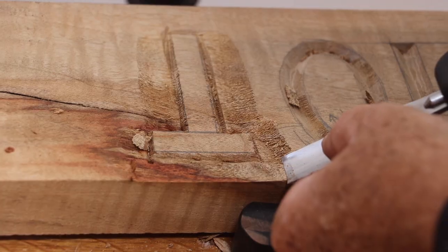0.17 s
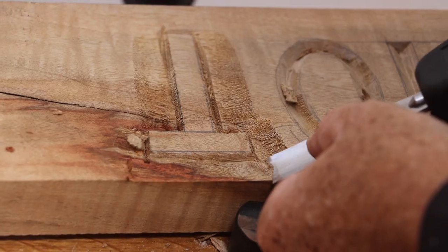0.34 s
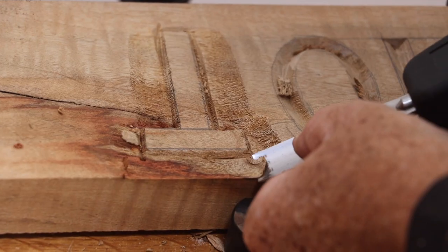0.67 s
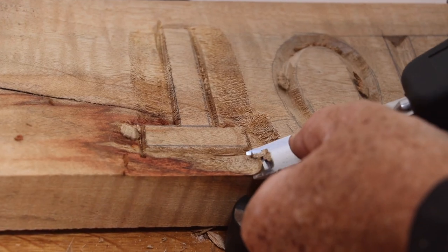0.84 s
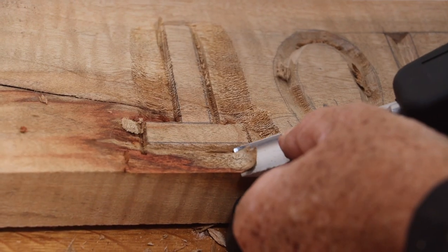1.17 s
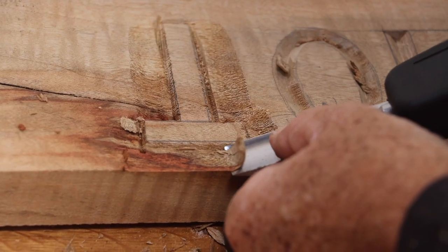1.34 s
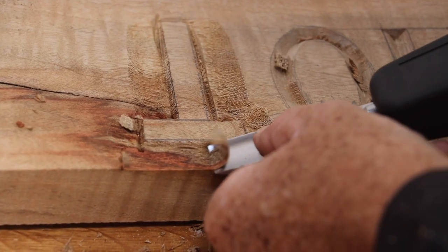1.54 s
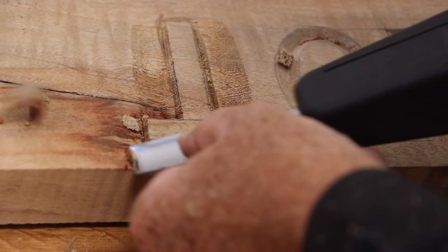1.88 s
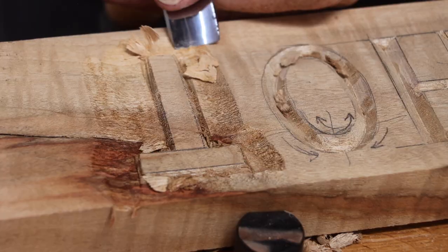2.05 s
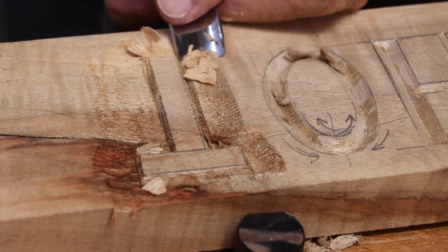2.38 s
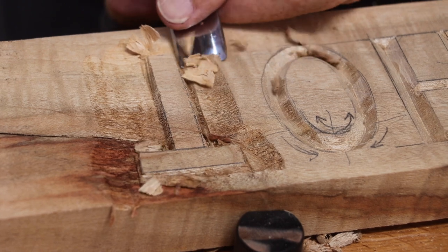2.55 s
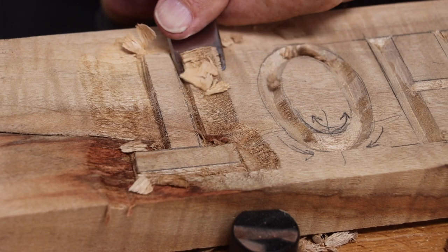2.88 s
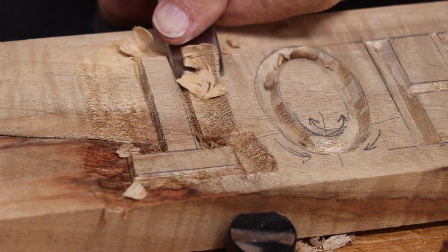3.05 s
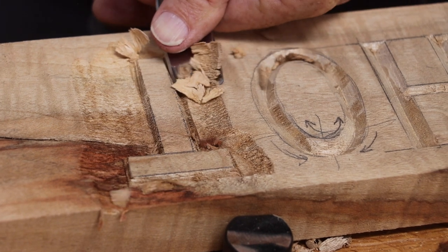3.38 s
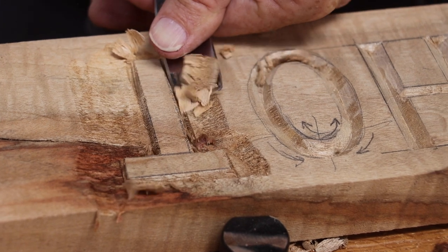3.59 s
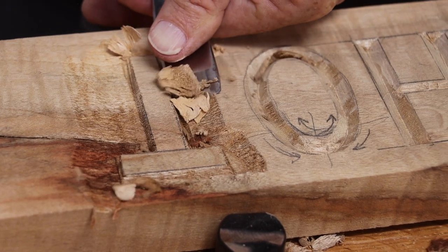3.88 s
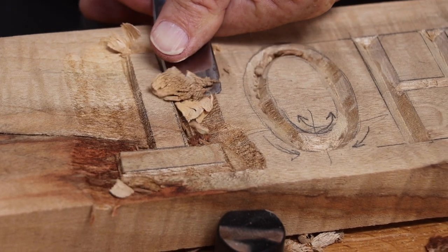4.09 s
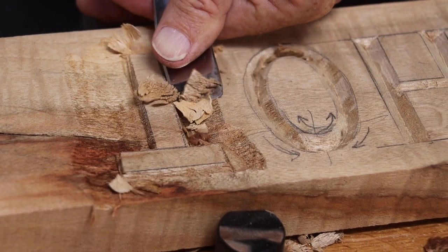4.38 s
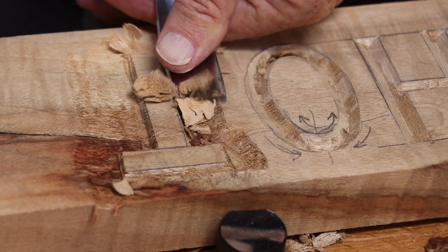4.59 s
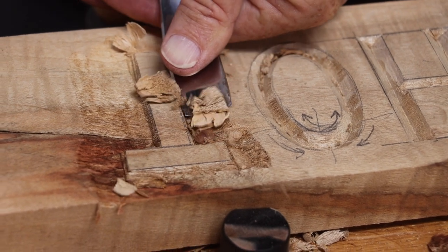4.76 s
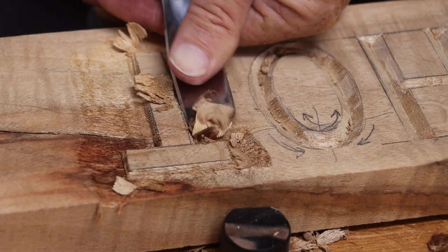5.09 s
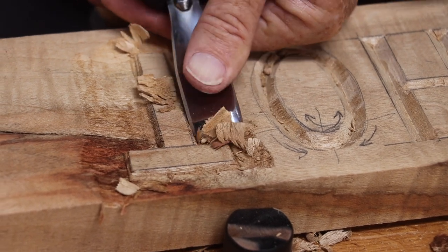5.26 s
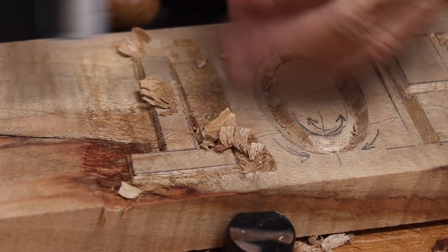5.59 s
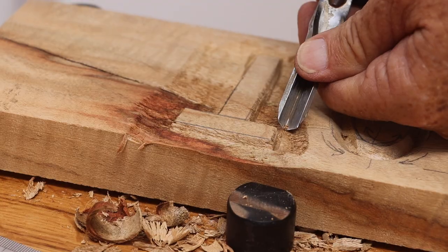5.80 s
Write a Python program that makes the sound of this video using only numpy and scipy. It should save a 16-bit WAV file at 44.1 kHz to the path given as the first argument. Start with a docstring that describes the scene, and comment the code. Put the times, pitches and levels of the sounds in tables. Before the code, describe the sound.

Close stereo pickup in a workshop. A power chisel's motor hisses and whines throughout. Separate knocks quickly merge into a bright, raspy buzz on clamped wood, ending before two seconds. After a tiny scraping touch, a longer, stronger cut growls and buzzes, with dull low thuds towards the left. It fades just after five seconds and the freed motor rises slightly in pitch.

```python
"""The motor of a carving chisel hisses and whines throughout: shaped noise and shaft-locked cosines.
From 0.27 s a cam, about 190 strokes a second, hammers the blade into a clamped board: pulses excite modes.
Lone knocks open this cut; it ends near 1.7 s, and a brief touch with a short noise burst follows near 1.87 s.
The second cut, 2.04 to 5.26 s, goes deeper; low decaying bumps, the thuds, accompany it, louder on the left.
The blade then lifts and the motor runs on, faster, to the end."""
import sys
import numpy as np
from scipy import signal
from scipy.fft import rfft, irfft
from scipy.io import wavfile
from scipy.ndimage import uniform_filter1d

SR = 44100
rng = np.random.default_rng(int(sys.argv[2]) if len(sys.argv) > 2 else 0)


def int16_out(signal):
    """Quantize to a 16-bit WAV file."""
    q = np.round(np.clip(np.atleast_2d(signal).T, -1, 1) * 32767)
    wavfile.write(sys.argv[1], SR, q.astype(np.int16))


N = 261513

# shaft speed, sagging under load: (time [s], rate [strokes/s])
SHAFT_SPEED = [(0, 198), (.5, 190.6), (.85, 189.8), (1.1, 189.5), (1.6, 189.5), (2.05, 191.4), (2.25, 191),
               (2.5, 189.8), (2.8, 189.1), (3.6, 187.9), (3.9, 187.5), (4.45, 188.8), (4.75, 188.2),
               (5.05, 188.9), (5.3, 194), (5.93, 192)]
# strength of the blows, one list a cut, the last a brief touch between the two: (time [s], level [dB])
CUT_LEVELS = [
    [(.27, -43.5), (.386, -38), (.494, -37.5), (.642, -35), (.95, -36), (1.524, -36.5), (1.7, -40)],
    [(2.04, -36), (2.09, -34), (2.2, -34.5), (2.38, -33), (2.55, -34), (2.75, -35.5), (3.18, -39),
     (3.65, -37), (4.11, -38.5), (4.45, -36.5), (4.7, -38), (5.07, -41), (5.1, -47), (5.14, -51),
     (5.26, -59)],
    [(1.83, -46), (1.86, -43), (1.89, -50)],
]
# which steel ring and dispersion each cut uses: index of the grip
CUT_GRIPS = [0, 1, 0]
# depth of the blade in the wood: (time [s], depth [0-5])
BLADE_DEPTH = [(1.95, 0), (2, 1), (2.25, 1), (2.42, 2), (2.8, 2), (3.05, 3), (3.75, 3), (3.95, 4),
               (4.45, 4), (4.7, 5)]
# stretches where the blade sits loose:
# (start [s], end [s], added unevenness [dB], weakening of every second blow [0-1], timing scatter [s])
LOOSE_STRETCHES = [(.2, .54, 1.8, .25, .00002), (1.42, 1.6, .4, .04, .00004), (1.6, 1.76, 1.5, .85, .00003),
                   (1.8, 1.95, 2.5, 0, .00005), (2, 2.22, .8, 0, .000015), (4.5, 5.03, .7, .04, .00003),
                   (5.03, 5.12, 1.2, .25, .00004)]
UNEVEN_DB, EASE_S = .6, .06  # unevenness of a firm blade; time for a stretch to ease in or out
# modes of board and blade: (frequency [Hz], width [Hz], gain at depth 0, 1, 2, 3, 4, 5 [dB])
BODY_MODES = [(95, 43, -21, -30, -35, -35, -41, -30), (205, 170, -18.5, 1.5, -31, -23, -20, -25),
              (277, 50, -9.5, -15, -25, -12, -11, -3), (373, 173, -25.5, -28, -5.5, 3.5, -0.5, 3),
              (485, 39, -5, -25, -25, -22, -20, -15), (566.3, 51, -3, -11, -6.5, 3, 8, 11),
              (737, 256, -41, -19, -13.5, 1.5, 4.5, 2), (914, 54, -11, -20, -20, -11, -20, -20),
              (892, 156, -5, 1, -3.5, -1.5, -19, -3), (1149, 114, 2.5, 9, 0.5, 4.5, 7, 5),
              (1299, 127, -5.5, 0, -31, -3, -6, -30), (1504, 114, -10, 1.5, -7, -7.5, -1, -9),
              (1690, 110, -16, -28, -18, -17, -14, -18), (1860, 210, -21, -33, -7, -4.5, -6, -13),
              (2072, 110, -7, -8, -10.5, -5.5, -10, -26), (2480, 200, 0, -4, -1, -3.5, -2, -2),
              (2833, 79, -4.5, -6, -8, -1, -6.5, -19), (3080, 210, -1.5, -9, -26, -23, -11, -17),
              (3214, 280, -5.5, 2, -27, -14, -4.5, -7), (3396, 130, 5.5, 3.5, 3.5, -11, 0, -0.5),
              (3603, 130, -1, -2, -0.5, 0, -1, -2), (3760, 69, 1.5, 5, 5, -1.5, -14, -2),
              (3953, 110, -14, 3, -9, -3, -4, -4.5), (4154, 130, 0.5, -19, 1.5, 8.5, 4.5, -1),
              (4353, 230, -19, 2, 4.5, 6, 1, -11), (4604, 255, -0.5, 1.5, 2.5, -19, -6.5, -3.5),
              (4737, 180, 0.5, -2, 2, 1, -30, -8), (4880, 100, -9, -14, -14, -7, -20, -18),
              (5130, 280, -9, -3, -1.5, -17, -18, -14), (5480, 410, -18, -2.5, 0.5, 1.5, -3, -5),
              (5960, 620, -7, -9, -1, -3, -5.5, -7.5)]
# answer of each part relative to the blow, one row a depth from 0 up:
# (bench shake [dB], board boom [dB], blade ring [dB])
PART_LEVELS = [(-17.5, -13.5, -2.5), (-17.5, -9, -5), (-26.5, -14.5, -5), (-24, -6, -6.5), (-17, -4, -4),
               (-14.5, -3.5, -3.5)]
LOOSE_BENCH_DB, LOOSE_RING_DB = 0.5, -2.5  # added for looseness [dB]; per dB of added unevenness [dB/dB]
# dispersion, one value a grip: spread [s] in lag = spread * sqrt(1000 / (f + 300))
DISPERSION_S = [.0022, .005]
BLOW_LAG_S, STEEL_LAG_S = .0018, .0011  # delay of the crack at 3.7 kHz, delay of the steel's excitation
BURIED_S, BURIED_HZ = .001, 300  # random lags of a buried blade: spread, and bandwidth of smoothing
# high ring of the steel, one list a grip:
# (frequency [Hz], nominal width [Hz], level re blow [dB], signed share of the drift)
STEEL_RINGS = [
    [(8900, 600, -14, 0), (11500, 1500, -20, 0), (14900, 350, -27, 0)],
    [(8500, 350, -18, -1.5), (12600, 850, -13.5, 1), (14900, 300, -24, 0)],
]
# shift of the steel's ring with the grip: (time [s], relative change)
RING_DRIFT = [(2.05, -.015), (2.5, 0), (3.2, .03), (3.8, .01), (4.6, -.015), (5.1, -.03)]
# rasp of the edge as it first bites in:
# (start [s], end [s], frequency [Hz], nominal width [Hz], level re blow [dB])
BITE_RASPS = [(.3, .49, 3150, 600, -4), (.35, .55, 1300, 130, -8), (.27, 0.52, 280, 69, -19)]
# spectrum of fibres tearing: (frequency [Hz], relative density [dB per Hz])
TEAR_SPECTRUM = [(150, -22), (300, -11), (1200, -34), (2000, -27), (3300, -5), (4600, 16), (6500, 8),
                 (7500, -27), (9000, 18), (12500, -23), (15500, -25)]
TEAR_DB, TEAR_LOOSE_DB = -5, 1  # gain re blow [dB], and more per dB of added unevenness [dB/dB]
TEAR_PATCHY_DB = 2
# lone blows while the blade only just touches the wood: (time [s], level [dB])
LONE_BLOWS = [(0.272, -18), (0.293, -21), (0.309, -18), (0.3308, -21), (0.3395, -20), (0.3548, -21),
              (0.3663, -20), (0.382, -23), (0.393, -24), (0.4053, -25), (0.4194, -24), (0.4357, -25),
              (1.843, -30), (1.857, -27), (2.0432, -24), (5.0794, -27), (5.1005, -25), (5.1166, -24),
              (5.1317, -24), (5.179, -31)]
# modes rung by lone blows, one list a cut: (frequency [Hz], width [Hz], gain [dB])
LONE_MODES = [
    [(1320, 300, -1), (3080, 420, 3.5), (4660, 500, -2), (2500, 300, 2), (8700, 1700, -6.5)],
    [(340, 180, 2), (1150, 280, 2), (3600, 500, 0), (4380, 900, 1), (5430, 410, -10)],
]
# short burst of rough noise during the brief touch:
# (time [s], spread [s], level [dB], frequency [Hz], width [Hz])
NOISE_BURST = (1.865, .016, -47, 1200, 1200)
# lean of the tool to the right: (time [s], left minus right level [dB])
TOOL_LEAN = [(1.9, 0), (2.5, -2.5), (3.2, -1.5), (3.7, -.3)]
# motor and fan noise: (time [s], level [dB], treble tilt [dB per octave])
MOTOR_LEVELS = [(0, -34.5, 2.5), (.14, -34, 2), (.17, -36, 1), (.5, -35, 0), (.65, -36.5, 1), (1.1, -40, 1),
                (1.5, -41.5, 0.5), (1.68, -39.5, 0.7), (1.73, -42.5, -1), (2.03, -40.5, 1),
                (2.06, -34.5, 1), (2.7, -40, 2), (3.5, -39.5, 0.5), (5.1, -40, 2.5), (5.22, -40.5, 2),
                (5.4, -37.5, 1.85), (5.77, -36.5, 2), (5.93, -38, 0.5)]
# spectrum of the motor noise: (frequency [Hz], relative density [dB per Hz])
HISS_SPECTRUM = [(24, -81), (40, -57), (214, -18), (303, -16.5), (582, -9.5), (627, -9.5), (766, -6.5),
                 (1010, -5), (1260, -1.5), (2190, -4.5), (4200, -1), (4640, -3.5), (11400, -8.5),
                 (15800, -20)]
# likeness of left and right noise: (frequency [Hz], correlation [0-1])
NOISE_LIKENESS = [(60, 0.4), (180, 0.39), (550, 0.6), (1220, 0.46), (2000, 0.053), (3400, 0.46),
                  (5500, 0.69), (9000, 0.21), (15000, 0.16)]
GEAR = 3.365  # armature turns per stroke
# armature orders before lift and waver: (multiple of armature rate, level [dB])
WHINE_ORDERS = [(1, -65), (2, -60), (3, -66.5), (4, -65.5), (5, -65), (6, -80)]
# changing strength of the whine: (time [s], lift of first order [dB], lift of higher orders [dB])
WHINE_LIFTS = [(0, 3, 4), (.14, 3, 3), (.2, 13.5, 7.5), (.5, 10, 8.5), (.62, 9, 2.5), (1.1, -5, 4),
               (1.65, -7, 5), (1.82, 2, 3), (1.86, 11.5, 6), (1.91, 7, 3), (1.95, 11, -1), (2.1, 14.5, 3),
               (2.4, 7, -12), (3, 0, -38), (5.1, -1, 2), (5.3, 4.5, -1), (5.93, -3, 5.5)]
# low thuds, before filtering and the left-right balance: (time [s], level [dB])
THUD_LEVELS = [(2.04, -63), (2.349, -59), (2.438, -47), (2.499, -54), (2.531, -57), (2.616, -51),
               (2.769, -53), (2.794, -48), (2.869, -47), (2.89, -44), (2.92, -42.5), (2.956, -47),
               (2.989, -48), (3.038, -51), (3.092, -41), (3.113, -41), (3.178, -51), (3.23, -50),
               (3.263, -46), (3.34, -51), (3.388, -47), (3.417, -49), (3.44, -38.5), (3.477, -47),
               (3.52, -50), (3.562, -44), (3.607, -38.5), (3.653, -43), (3.739, -47), (3.771, -53),
               (4.513, -57), (5.083, -66), (5.118, -54), (5.137, -56)]
THUD_RISE_S, THUD_LEAD_S = .003, .005  # a thud swells this long and starts this far ahead of its listed time
THUD_LAG_S = .002  # thuds reach the right microphone late
CRUNCH = .8  # grit in a thud relative to its bump
# rumble under the thuds, before the left-right balance: (time [s], level [dB])
RUMBLE_LEVELS = [(.27, -88), (.42, -68), (.7, -80), (1.65, -82), (2.3, -63), (2.72, -67), (2.9, -58),
                 (3.55, -50), (3.85, -63), (5.1, -67.5), (5.45, -100), (5.93, -65)]
EDGE_HZ = 15780  # upper limit of the band


def chisel_cut(rows, steel, spread_s, turns, tear):
    """Forced vibration: one blow a stroke excites bench, board and blade, tears fibres and rattles steel."""
    t = np.arange(N) / SR
    (blow_db,), (depth,) = curve(rows, t), curve(BLADE_DEPTH, t)
    first, last = rows[0][0], rows[-1][0]
    loose = np.array([stretch(t, start, end) for start, end, *_ in LOOSE_STRETCHES])
    extra_db, weak, scatter_s = np.transpose(LOOSE_STRETCHES)[2:] @ loose
    stroke = turns.astype(int)
    luck = np.clip(rng.standard_normal(stroke[-1] + 1), -1.5, 1.5)[stroke]
    size = amp((UNEVEN_DB + extra_db) * luck) * (1 - np.clip(weak, 0, 1) * (stroke % 2))
    touching = np.interp(t, [first - .003, first, last, last + 0.044], [0, 1, 1, 0])
    on = touching > .5

    blows = blow_pulses(turns, size * touching, scatter_s)
    body = drifting(body_modes(blows, depth), .6)
    crack = buried(dispersed(body, spread_s), depth)
    bench_db, board_db, ring_db = (
        blow_db + np.interp(depth, range(len(PART_LEVELS)), db) for db in np.transpose(PART_LEVELS))
    bench_db = bench_db + LOOSE_BENCH_DB * loose.sum(0)
    ring_db = ring_db + LOOSE_RING_DB * extra_db
    parts = [(body, bench_db, 85, 280), (body, board_db, 280, 850),
             (body, ring_db, 850, 1600), (crack, blow_db - 1.5, 1600, 8000)]
    out = 0
    for source, db, lo_hz, hi_hz in parts:
        part = band(source, lo_hz, hi_hz)
        # levelled by its running power while the blade touches
        contact = uniform_filter1d(on * 1., size=6000) + 0.0013
        power = uniform_filter1d(part ** 2 * on, size=6000) / contact
        out = out + amp(db) * part / np.sqrt(abs(power) + 1e-9)
    ring_out = np.exp(-np.maximum(t - last, 0) / 0.049) * (t > first)
    out *= np.maximum(touching, ring_out)

    dying = np.exp(-((turns - .15) % 1) / 0.1)  # noise dies away within each stroke
    burst = size * touching * (.15 + dying)
    rattle = size * touching * (.1 + dying) * rng.standard_normal(N) + 11 * blows
    out += steel_ring(rattle, steel, blow_db, on) + bite_rasp(rattle, blow_db, on)
    return out, amp(blow_db + TEAR_DB + TEAR_LOOSE_DB * extra_db) * burst * tear


def blow_pulses(turns, strength, scatter_s):
    """Impulsive excitation: a pulse a stroke, shared between two samples to keep its exact time."""
    stroke = turns.astype(int)
    at = np.flatnonzero(np.diff(stroke))[1:-1] + 1
    crossing = at - (turns[at] % 1) / (turns[at] - turns[at - 1])
    place = crossing + scatter_s[at] * SR * rng.standard_normal(len(at))
    before, late = place.astype(int), place % 1
    blows = np.zeros(N)
    blows[before] = strength[at] * (1 - late)
    blows[before + 1] = strength[at] * late
    return blows


def body_modes(blows, depth):
    """Modal superposition: each mode has a resonance peak; depth changes how well it is struck."""
    hz, body = np.fft.rfftfreq(4096, 1 / SR), np.zeros(N)
    mode_hz, widths, *answers = np.transpose(BODY_MODES)
    peaks = 1 / (1 + (2 * (hz[:, None] - mode_hz) / widths) ** 2)
    for k, answer_db in enumerate(answers):
        colour_db = 10 * np.log10(peaks ** 2 @ amp(2 * answer_db))
        share = np.clip(1 - abs(depth - k), 0, 1)  # crossfade between neighbouring depths
        body += share * signal.oaconvolve(blows, minimum_phase(colour_db))[:N]
    return body


def dispersed(x, spread_s):
    """Dispersion: bending waves in steel carry the treble ahead of the lower tones."""
    hz = np.fft.rfftfreq(4096, 1 / SR)
    bending = -4j * np.pi * spread_s * np.sqrt(1000 * (hz + 300))
    delay = -2j * np.pi * hz * (BLOW_LAG_S - spread_s / 2)
    return signal.oaconvolve(x, irfft(np.exp(bending + delay))[:1024])[:N]


def buried(crack, depth):
    """Phase scattering: a buried blade rings out of step, each band with its own random lag."""
    hz = np.fft.rfftfreq(4096, 1 / SR)
    wander = uniform_filter1d(rng.standard_normal(len(hz)), size=round(BURIED_HZ / hz[1]))
    lag_s = BURIED_S * np.clip(evened(wander), -2, 2)
    # phase is the integral of lag over frequency; centred so that lags of either sign fit
    scatter = np.roll(irfft(np.exp(-2j * np.pi * hz[1] * np.cumsum(lag_s))), 512)[:1024]
    deep = np.clip(depth - 1, 0, 1)
    return (1 - deep) * crack + deep * signal.oaconvolve(crack, scatter)[512:][:N]


def steel_ring(rattle, steel, blow_db, on):
    """Resonance: the rattle of each blow excites high steel modes whose pitch follows the grip."""
    drift = curve(RING_DRIFT, np.arange(N) / SR)[0]
    late, out = np.roll(rattle, round(STEEL_LAG_S * SR)), 0
    for hz, width, db, share in steel:
        ring = glide(late, hz * (1 + share * drift), width)
        out = out + amp(blow_db + db) * ring / ring[on].std()
    return out


def bite_rasp(rattle, blow_db, on):
    """Resonance: rattle through two cascaded resonators rasps as the edge first bites in."""
    t, late, out = np.arange(N) / SR, np.roll(rattle, round(BLOW_LAG_S * SR)), 0
    for start, end, hz, width, db in BITE_RASPS:
        rasp = resonate(resonate(late, hz, width), hz, 2 * width)
        out = out + amp(blow_db + db) * stretch(t, start, end) * rasp / rasp[on].std()
    return out


def lone_blows():
    """Transient excitation: single knocks, each a brief rough scrape ringing a few short modes."""
    out, t = 0, np.arange(200) / SR
    s, db = np.transpose(LONE_BLOWS)
    second = s > CUT_LEVELS[1][0][0]
    pulse = (t / 0.0004) * np.exp(1 - t / 0.0005)
    for modes, mine in zip(LONE_MODES, (~second, second)):
        clicks = np.zeros(N)
        clicks[np.round(s[mine] * SR).astype(int) + 12] = amp(db[mine])
        scrape = signal.oaconvolve(clicks, pulse)[:N] * rng.choice([-1., 1.], N)
        out = out + sum(amp(gain_db) * resonate(scrape, hz, width) for hz, width, gain_db in modes)
    return out


def noise_burst():
    """Resonance: uneven random noise excites one broad resonance under a short bell-shaped swell."""
    s, spread_s, db, hz, width = NOISE_BURST
    rough = rng.standard_normal(N) * amp(3 * uniform_filter1d(rng.exponential(1, N), size=20))
    swell = np.exp(-.5 * ((np.arange(N) / SR - s) / spread_s) ** 2)
    return amp(db) * swell * evened(resonate(rough, hz, width))


def motor(turns):
    """Modulation: fan and brush noise throbs with the shaft; harmonics of the armature rate waver."""
    t = np.arange(N) / SR
    level_db, tilt = curve(MOTOR_LEVELS, t)
    throb = 1 + 0.062 * np.cos(2 * np.pi * turns)
    hiss = amp(level_db) * throb * band(noise(HISS_SPECTRUM, 1.74, tilt), 57, 22000)
    wavers = uniform_filter1d(rng.standard_normal((N, len(WHINE_ORDERS))), size=3000, axis=0)
    first_db, higher_db = curve(WHINE_LIFTS, t)
    whine = 0
    for (k, db), waver in zip(WHINE_ORDERS, evened(wavers).T):
        lift_db = first_db if k == 1 else higher_db
        tone = np.sqrt(2) * np.cos(2 * np.pi * k * GEAR * turns + 0.5 * waver)
        whine = whine + amp(db + 2.0 * waver + lift_db) * tone
    return hiss + whine


def thuds():
    """Damped oscillation: short low bumps with a dull crunch over faint band-limited rumble."""
    out, t = np.zeros(N + SR), np.arange(3000) / SR
    swell = (t / THUD_RISE_S) * np.exp(1 - t / THUD_RISE_S)
    for s, db in THUD_LEVELS:
        hz, grit = rng.uniform(100, 150), rng.standard_normal(3000)
        bump = np.cos(2 * np.pi * hz * (t - THUD_RISE_S)) + CRUNCH * evened(band(grit, 150, 600))
        out[round((s - THUD_LEAD_S) * SR):][:3000] += amp(db) * swell * bump
    pair = np.array([out[:N], np.roll(out, round(THUD_LAG_S * SR))[:N]])
    low = band(rng.standard_normal((N, 2)).T, 75, 380)
    rumble = amp(curve(RUMBLE_LEVELS, np.arange(N) / SR)[0]) * evened(low + 0.1 * low[::-1])
    return (band(pair, 43, 860) + rumble) * amp([[3], [-5]])


def shop(x):
    """Reflection: sparse side-wall echoes reach the microphones in opposite sense, a weak tail in equal sense."""
    t = np.arange(9000) / SR
    sparse = rng.random((9000, 2)).T < .05
    decay = amp(-60 * t / 1.03) * (t > .001)
    taps = rng.standard_normal((9000, 2)).T * sparse * decay
    taps /= np.linalg.norm(taps, axis=1)[:, None]
    sides, tail = signal.oaconvolve(x[None], taps, axes=1)[:, :N]
    near = x + amp(-16) * band(tail, 1500, 15000)
    return near + amp(-6.5) * band(sides, 600, 18000) * np.array([[1], [-1]])


def noise(points, patchy_db, tilt=0):
    """Spectral synthesis: partly correlated stereo noise from random spectra with drifting patches."""
    frames, hz = N // 128 + 5, np.fft.rfftfreq(512, 1 / SR)
    a, b, c, d, patches = rng.standard_normal((frames, 257, 5)).T
    patches = evened(uniform_filter1d(uniform_filter1d(patches, size=6, axis=0), size=24, axis=1))
    same = read(NOISE_LIKENESS, hz)[:, None]
    left, other = a + 1j * b, c + 1j * d
    z = np.array([left, same * left + np.sqrt(1 - same ** 2) * other])
    octaves = np.log2((hz[:, None] + 100) / 4000)  # about 4 kHz
    slope_db = octaves * np.resize((tilt + np.zeros(N))[::128], frames)
    z *= amp(read(points, hz)[:, None] + patchy_db * patches + slope_db)
    return evened(signal.istft(z, nperseg=512, noverlap=384)[1][:, :N])


def drifting(x, patchy_db):
    """Slow modulation: each tone swells and fades on its own as hand and blade shift."""
    z = signal.stft(x, nperseg=1024, noverlap=768)[2]
    patches = rng.standard_normal(z.T.shape)
    patches = uniform_filter1d(uniform_filter1d(patches, size=40, axis=0), size=6, axis=1)
    return signal.istft(z * amp(patchy_db * evened(patches).T), nperseg=1024, noverlap=768)[1][:N]


def glide(x, hz, width):
    """Heterodyning: shift the curve hz down to zero, smooth twice, shift back."""
    turn, r = np.exp(2j * np.pi * np.cumsum(hz) / SR), np.exp(-np.pi * width / SR)
    return (turn * signal.lfilter([1], np.convolve([1, -r], [1, -r]), x / turn)).real


def resonate(x, hz, width):
    """Simple resonance: a two-pole filter with unit gain at its peak."""
    return signal.lfilter(*signal.iirpeak(hz, hz / width, SR), x)


def minimum_phase(db):
    """Causality: fold the cepstrum of gains on 2049 bins to get the minimum-phase response."""
    cepstrum = irfft(np.log(amp(np.maximum(db, -100))))
    cepstrum[1:2048] *= 2
    cepstrum[2049:] = 0
    return irfft(np.exp(rfft(cepstrum)))[:2048]


def band(x, lo_hz, hi_hz):
    """Band-pass filtering: keep the tones between two frequencies."""
    return signal.sosfilt(signal.butter(3, [lo_hz, hi_hz], "band", fs=SR, output="sos"), x)


def stretch(t, start, end):
    """Gating: 1 between start and end, easing in and out."""
    return np.clip(np.minimum(t - start, end - t) / EASE_S + .5, 0, 1)


def curve(rows, t):
    """Linear interpolation of every column over time."""
    s, *columns = np.transpose(rows)
    return [np.interp(t, s, c) for c in columns]


def read(points, hz):
    """Interpolation on a logarithmic frequency axis."""
    f, value = np.transpose(points)
    return np.interp(np.log(hz + 1), np.log(f + 1), value)


def evened(x):
    """Normalisation to unit root-mean-square."""
    return x / np.sqrt(np.mean(x ** 2) + 1e-20)


def amp(db):
    """Decibels to amplitude ratio."""
    return 10 ** (np.asarray(db) / 20)


def scene():
    """Superposition: the leaning tool with its reflections, then fibres, motor and thuds."""
    t = np.arange(N) / SR
    turns = np.cumsum(curve(SHAFT_SPEED, t)[0]) / SR  # strokes since the start
    tear = band(noise(TEAR_SPECTRUM, TEAR_PATCHY_DB), 150, 22000)
    cuts = [chisel_cut(rows, STEEL_RINGS[grip], DISPERSION_S[grip], turns, tear)
            for rows, grip in zip(CUT_LEVELS, CUT_GRIPS)]
    blows, fibres = zip(*cuts)
    lean = amp(np.array([[.5], [-.5]]) * curve(TOOL_LEAN, t)[0])
    tool = lean * shop(sum(blows) + lone_blows() + noise_burst())
    return tool + sum(fibres) + motor(turns) + thuds()


def record(dry):
    """Low-pass response: a gentle step down above about 15 kHz, then a steep upper limit."""
    dull = signal.oaconvolve(dry, signal.firwin(201, 15150, fs=SR)[None], "same")
    soft = dull + amp(-25) * (dry - dull)
    edge = signal.firwin(511, EDGE_HZ, window=("kaiser", 9), fs=SR)
    return signal.oaconvolve(soft, edge[None], "same")


dry = scene()
out = record(dry)
int16_out(out)
```